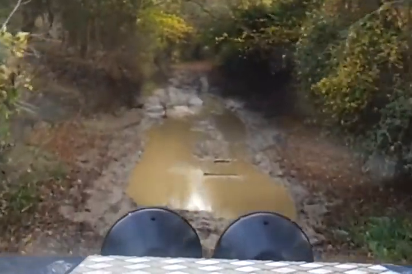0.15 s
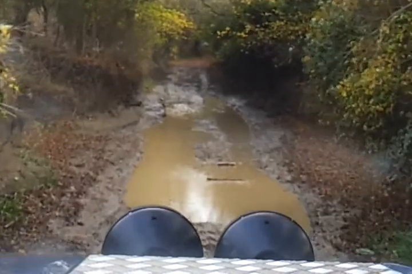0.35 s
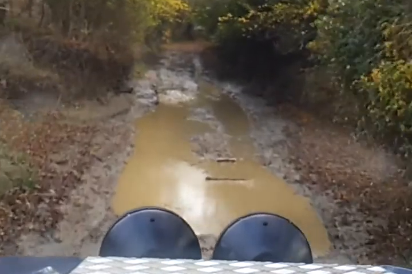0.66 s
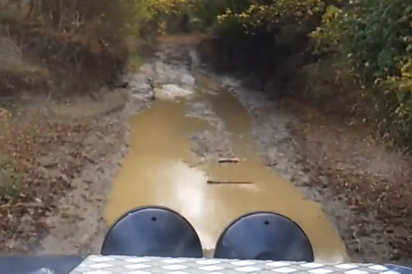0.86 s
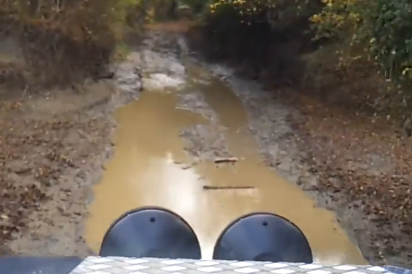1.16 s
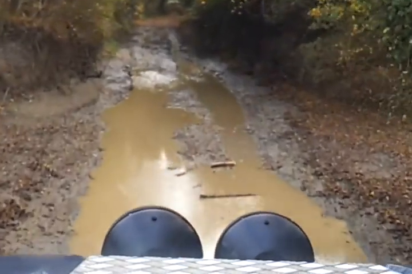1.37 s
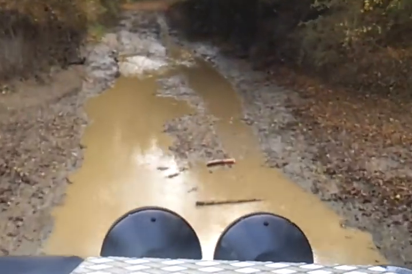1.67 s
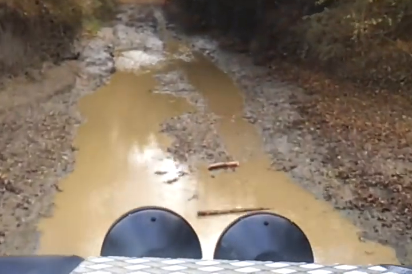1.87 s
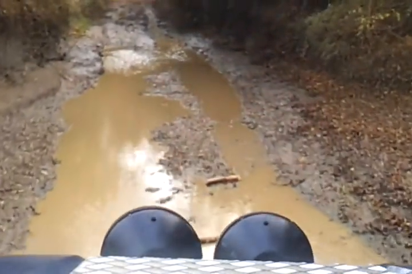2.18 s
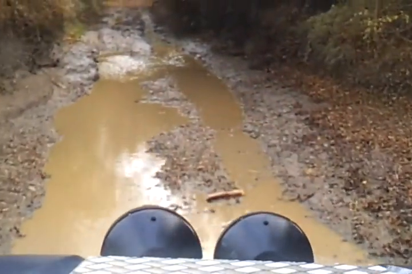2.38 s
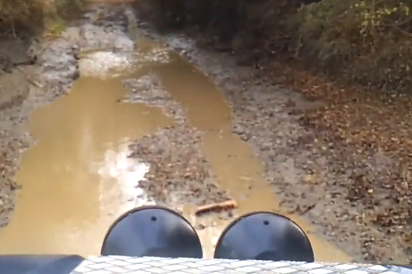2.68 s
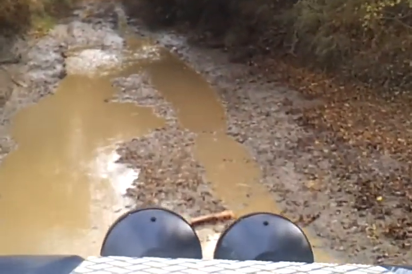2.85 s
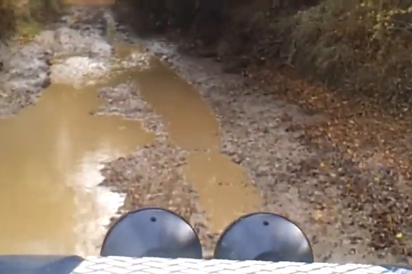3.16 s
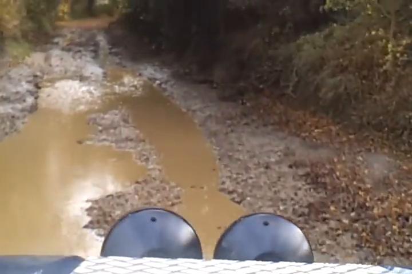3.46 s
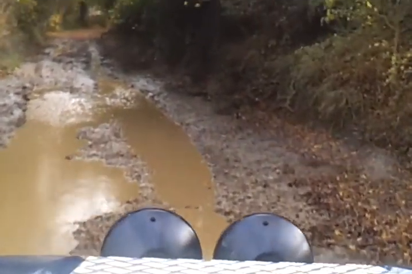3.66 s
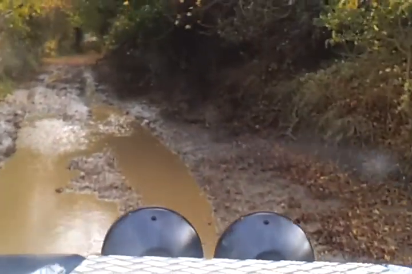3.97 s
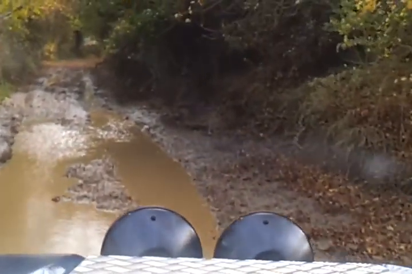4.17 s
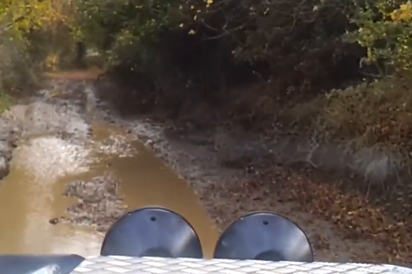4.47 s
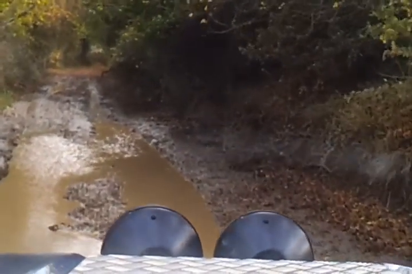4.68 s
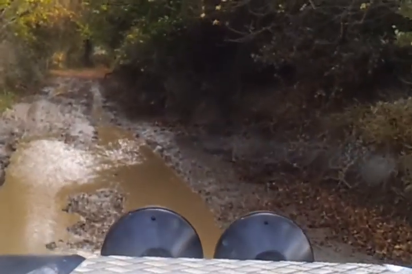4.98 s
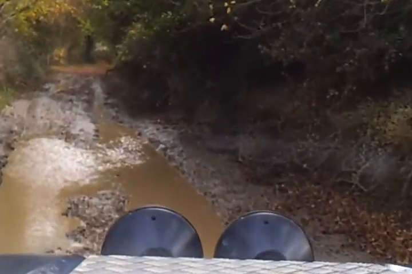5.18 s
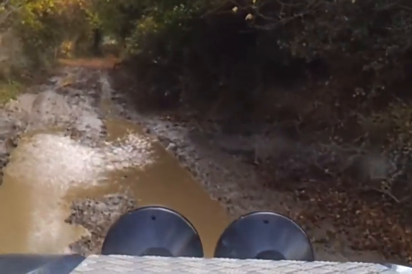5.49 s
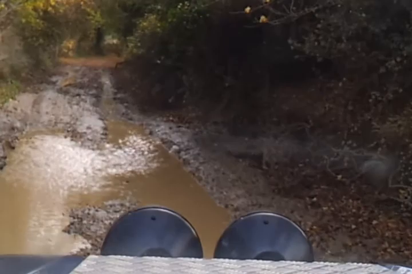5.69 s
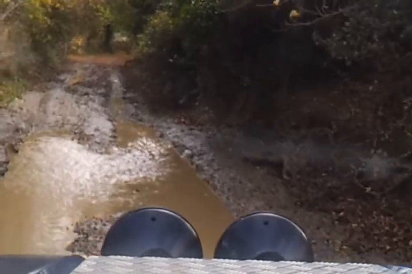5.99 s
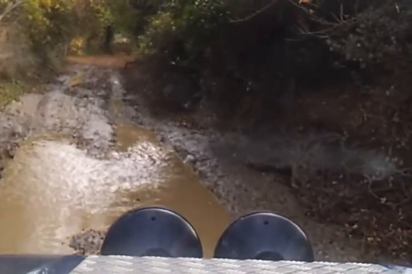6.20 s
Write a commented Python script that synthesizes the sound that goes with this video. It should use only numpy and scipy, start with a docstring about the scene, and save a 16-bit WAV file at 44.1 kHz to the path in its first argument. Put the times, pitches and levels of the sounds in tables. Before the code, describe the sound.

Inside an off-road vehicle, a four-cylinder engine growls, slows and settles into a knocking low-speed chug. An early jolt leaves a metal bar ringing. The body drums and roars over ruts, with thumps, rattling trim and small metal jingles. After a clattering bump just past one second, water gurgles faintly below and hisses. Later knocks come in clusters as revs creep up. Close, boxy cab sound with dull treble.

```python
"""Fording mud in a four-cylinder off-roader

Heard from inside the cab: an engine of wavering sine orders fires about thirty times a second and knocks.
Shaped noise drums, roars, clatters and hisses; bumps swell a cab boom and a struck metal bar rings on.
Noise bursts through bands and resonances thump, rub, jingle and knock; from 1.3 s rising sines gurgle."""
import sys
import numpy as np
from scipy import signal
from scipy.fft import rfft, irfft
from scipy.io import wavfile
from scipy.ndimage import uniform_filter1d

SR = 44100
rng = np.random.default_rng(int(sys.argv[2]) if len(sys.argv) > 2 else 0)


def transcribe(u):
    """Save the signal u as a 16-bit wav file named by the first command-line argument.

    u: samples, shape (n,) or (channels, n), limited to [-1, 1]; the rate is SR.
    q: integer samples, one column per channel.
    """
    v = np.clip(np.atleast_2d(u).T, -1, 1)
    q = np.round(v * 32767).astype(np.int16)
    wavfile.write(sys.argv[1], SR, q)


N = 279594

# Pace of the engine. Each row: time in seconds, firing rate in Hz.
FIRING_RATE = [(0.0, 39.2), (0.48, 37.7), (1.09, 33.2), (1.42, 31.6), (1.75, 28.4), (2.75, 28.4),
               (3.04, 29.2), (3.3, 29.3), (3.78, 28.9), (4.22, 29.7), (4.43, 25.9), (4.5, 26.0),
               (4.7, 28.6), (5.01, 28.7), (5.47, 29.9), (6.34, 31.8)]
# Broad sounds of the ride. Each row: time in seconds, then levels in dB of the body drumming,
# of the cab roar ahead of the panels, and of the water hiss.
RIDE_LEVELS = [(0.0, -40, -23, -43), (0.09, -24.5, -25, -41), (0.3, -25.5, -31.5, -42.5),
               (1.25, -28.5, -34, -43.5), (1.36, -30, -37.5, -43), (2.26, -30.5, -34.5, -44.5),
               (2.84, -32, -33.5, -43), (3.05, -36.5, -35.5, -42), (3.74, -27.5, -30, -39.5),
               (4.11, -31, -32.5, -40), (4.45, -29, -29.5, -38), (4.84, -29.5, -32.5, -39),
               (5.44, -25.5, -31.5, -37), (5.63, -29.5, -31, -39), (5.97, -26, -31.5, -37.5),
               (6.34, -26.5, -31, -39)]
IDLE_HZ = 29  # firing rate at which clatter and combustion knock have their plain levels


def amp(db):
    """Amplitude factor of a level in dB."""
    return 10 ** (np.asarray(db) / 20)


def evened(x):
    """Scales a sound to rms 1."""
    return x / np.sqrt(np.mean(x ** 2) + 1e-20)


def peaked(x, db):
    """Scales a sound to a peak level in dB."""
    return amp(db) * x / abs(x).max()


def curves(rows):
    """Each column of a table, drawn out sample by sample."""
    s, *columns = np.transpose(rows)
    return [np.interp(np.arange(N) / SR, s, c) for c in columns]


def add(mix, s, sound):
    """Lays a sound into the mix at s seconds."""
    part = mix[round(s * SR):][:len(sound)]
    part += sound[:len(part)]


def wander(per_s):
    """Slow random drift of rms 1, rolled off above per_s Hz."""
    count = N // 128 + 2
    hz = np.fft.rfftfreq(count, 128 / SR)
    smooth = irfft(rfft(rng.standard_normal(count)) / (1 + (hz / per_s) ** 4), count)
    return np.interp(np.arange(N) / 128, np.arange(len(smooth)), evened(smooth))


def coloured(x, points, size=4096):
    """Filters x by a spectrum given in dB on a log-frequency axis, then evens it to rms 1."""
    f, db = np.transpose(points)
    hz = np.fft.rfftfreq(size, 1 / SR)
    response = amp(np.interp(np.log(hz + 1), np.log(f), db))
    taps = np.roll(irfft(response), size // 2) * np.hanning(size)
    return evened(signal.oaconvolve(x, taps, "same"))


def band(x, hz, octaves):
    """A bell-shaped band on a log-frequency axis; octaves is the bell's standard deviation."""
    f = np.fft.rfftfreq(len(x), 1 / SR) + 1
    return irfft(rfft(x) * np.exp(-.5 * (np.log2(f / hz) / octaves) ** 2), len(x))


def resonate(x, hz, width):
    """A fixed resonance of gain 1, width in Hz."""
    r = np.exp(-np.pi * width / SR)
    return 2 * signal.lfilter([1 - r], [1, -r * np.exp(2j * np.pi * hz / SR)], x).real


def ring(x, modes):
    """x strikes a set of modes; the factor t60 lets narrow modes start as strongly as wide ones."""
    return sum(amp(db) * resonate(x, hz, 2.2 / t60) * t60 for hz, db, t60 in modes)


def shake(length, t60, lumps_db):
    """Noise that holds for the contact time, in uneven lumps, then dies away."""
    t = np.arange(round(.25 * SR)) / SR
    noise, lumps = rng.standard_normal((2, len(t)))
    lumps = amp(lumps_db * evened(uniform_filter1d(lumps, size=90)))
    attack = np.minimum(t / 0.00051, 1)
    fade = amp(-60 * np.maximum(t - length, 0) / max(t60, .005))
    return noise * lumps * attack * fade


def crackle(x):
    """Sparse sharp contacts stand out of a rattle, each decaying with a half-millisecond constant."""
    contacts_per_s, contact_db = 600, 5
    hits = (rng.random(len(x)) < contacts_per_s / SR) * rng.random(len(x))
    spikes = signal.lfilter([1], [1, -np.exp(-1 / (.0005 * SR))], hits)
    return x * (1 + amp(contact_db) * spikes)


def puffs(firings, fade):
    """One burst a firing, uneven between cylinders and strokes; fade is in firing periods."""
    # Relative strength of each cylinder's burst, in firing order, in dB.
    cylinder_db = np.array([0, -3, -7, -10.])
    stroke = firings.astype(int)
    chance_db = 1.5 * rng.standard_normal(stroke[-1] + 1)[stroke]
    strength_db = cylinder_db[stroke % 4] + chance_db
    return evened(amp(strength_db) * np.exp(-(firings % 1) / fade))


def engine():
    """Firing orders as wavering sines; also returns the running count of firings."""
    # Lowest orders. Each row: time in seconds, level in dB of the firing tone, level in dB of its octave.
    low_orders = [(0, -30, -16.5), (.1, -36, -24.5), (.22, -18.5, -27.5), (.35, -29, -24), (.5, -22.5, -27),
                  (.62, -28, -25), (.7, -21, -32), (.78, -33, -28.5), (.88, -24, -20.5), (1., -31, -25),
                  (1.12, -25, -26), (1.2, -24.5, -35), (1.28, -28, -35), (1.4, -47, -34), (1.8, -36.5, -33),
                  (2.1, -33.5, -39), (2.4, -44.5, -47), (2.8, -32.5, -43), (3.1, -27.5, -29.5),
                  (3.4, -27, -31), (3.75, -26.5, -29.5), (4.05, -31.5, -39), (4.3, -33.5, -32),
                  (4.55, -42, -27), (4.9, -24.5, -29.5), (5.2, -29, -29), (5.5, -26.5, -40.5),
                  (5.85, -28, -27), (6.05, -36, -30), (6.34, -39, -29.5)]
    # Each row: time in seconds, levels in dB of the 3rd, 4th, 5th and 6th multiple of the firing rate.
    middle_orders = [(0.0, -34, -36, -37, -39), (0.2, -36, -29, -41, -42), (0.5, -37, -32.5, -45, -60),
                     (0.75, -45, -37.5, -40, -46), (0.95, -38, -44, -30, -63), (1.2, -29, -38, -37, -49),
                     (1.45, -46.5, -63, -50, -52), (1.8, -41, -40, -52, -61), (2.3, -56, -39.5, -53, -51),
                     (2.8, -47, -41.5, -48, -50), (3.1, -39, -38, -50, -45), (3.4, -40, -40.5, -42, -40),
                     (3.7, -32, -33, -41, -41), (4.0, -40.5, -43, -45, -49), (4.3, -38.5, -39, -38.5, -42),
                     (4.6, -32.5, -36, -41, -40), (4.9, -32.5, -44, -38, -37.5),
                     (5.2, -36.5, -35, -38.5, -35.5), (5.5, -40, -42, -39.5, -39),
                     (5.8, -41, -39, -39, -36), (6.1, -36, -36, -36.5, -41.5), (6.34, -49, -42, -38, -38)]
    # Faint orders, quarter ones from uneven cylinders. Each row: multiple of the firing rate, relative dB.
    faint_orders = [(.75, -6), (1.25, 0), (1.5, -6), (1.75, -1), (2.25, 0), (2.5, -6), (2.75, -6),
                    (3.5, -11), (7, -8), (8, -12)]
    faint_db, faint_waver_db = -13.5, 1  # level under the two lowest orders together; extra waver

    firings = np.cumsum(curves(FIRING_RATE)[0]) / SR
    first_db, second_db = curves(low_orders)
    both_db = 10 * np.log10(amp(2 * first_db) + amp(2 * second_db))
    orders = list(enumerate([first_db, second_db] + curves(middle_orders), start=1))
    for multiple, db in faint_orders:
        orders.append((multiple, both_db + faint_db + db + faint_waver_db * wander(3.4)))

    tones = np.zeros(N)
    for multiple, db in orders:
        phase = 2 * np.pi * (multiple * firings + rng.random()) + .4 * wander(7.)
        tones += amp(db + 1.5 * wander(9.)) * np.sin(phase)
    return np.sqrt(2) * tones, firings


def combustion(firings):
    """The knock rings the engine block and, more slowly, one narrow singing cab panel."""
    # Engine block resonances. Each row: centre in Hz, width in Hz, relative level in dB.
    block_modes = [(1270, 200, 7.5), (1595, 79, 3.5), (2077, 45, 3.5), (2660, 130, -7)]
    # Singing panel. Each row: time in seconds, level in dB of its knocked part.
    panel_levels = [(0, -44), (.2, -42), (.3, -41.5), (.45, -47), (.6, -42), (1.2, -55), (1.4, -48.5),
                    (1.7, -44), (2.5, -41), (2.9, -46.5), (3.3, -43.5), (3.75, -54), (3.9, -36.5),
                    (4., -48), (4.3, -40), (4.4, -39), (4.6, -41.5), (5.4, -38.5), (5.6, -52),
                    (5.83, -40.5), (6.2, -44), (6.34, -37.5)]
    knock_db, sag_db_per_hz = -47.5, -1.5  # level at idle; softer as the engine runs faster
    panel_hz, note_db = 984., 7  # the steady note's level is against the knocked part

    a, b = rng.standard_normal((2, N))
    knock = a * puffs(firings, .25)
    block = np.zeros(N)
    for hz, width, db in block_modes:
        block += amp(db) * resonate(resonate(knock, hz, width), hz, 4 * width) / np.sqrt(width)
    late_knock = b * puffs(firings - .15, .35)
    knocked = resonate(resonate(late_knock, panel_hz, 13.), panel_hz, 60.)

    phase = 2 * np.pi * panel_hz * np.arange(N) / SR + 1.3 * wander(10.)
    note = amp(1. * wander(12.)) * np.sin(phase)
    # the note sags over the last third of each four firings, which takes in the weakest cylinder
    cycle = np.where(firings / 4 % 1 < .67, 1, .45)
    panel = evened(knocked) + amp(note_db) * evened(note * uniform_filter1d(cycle, size=400))
    block_db = knock_db + sag_db_per_hz * (curves(FIRING_RATE)[0] - IDLE_HZ)
    return amp(block_db) * evened(block) + amp(curves(panel_levels)[0]) * evened(panel)


def through_panels(x):
    """The cab panels add their resonances to whatever shakes them."""
    # Each row: centre in Hz, width in Hz, gain in dB against the broad sound.
    panels = [(1384, 73, -5), (1670, 28, -13.5), (2110, 42, -3)]
    return x + sum(amp(db) * resonate(x, hz, width) for hz, width, db in panels)


def ride(firings):
    """Noise as drumming, roar and clatter in the body, and hiss with droplets, the last three firing-pulsed."""
    # Spectra of the four noises. Each row: frequency in Hz, relative level in dB per Hz.
    drum_spectrum = [(8, -40), (14, -14), (20, -3), (30, 0), (60, 0), (110, -6.5), (160, -6), (200, -7),
                     (280, -13), (400, -14), (520, -40), (880, -120)]
    roar_spectrum = [(120, 0), (200, -3), (276, 5), (438, 11.5), (765, 3.5), (851, -2.5), (907, -25),
                     (981, -11), (1100, -12), (1430, -54), (2420, -120)]
    clatter_spectrum = [(470, -43), (800, -3.5), (898, 1.5), (981, 3), (1080, -1.5), (1660, -3),
                        (2080, -7.5), (2270, -20.5), (2800, -10), (3640, -49.5), (6160, -120)]
    hiss_spectrum = [(1290, -6.5), (2200, -6.5), (2490, -9), (2750, -11), (3100, -8), (3460, -7),
                     (4010, -8.5), (5810, -8.5), (6650, -11), (7270, -23.5), (7660, -22), (9960, -2),
                     (16900, -120)]
    clatter_over_hiss_db, sag_db_per_hz = 0.5, -0.07  # at idle; softer as the engine runs faster
    roar_sway_db, roar_jolt_db = 1.3, .7

    drum_db, roar_db, hiss_db = curves(RIDE_LEVELS)
    clatter_db = hiss_db + clatter_over_hiss_db + sag_db_per_hz * (curves(FIRING_RATE)[0] - IDLE_HZ)
    a, b, c, d = rng.standard_normal((4, N))
    jolts = wander(7.1)  # the ruts shake roar, clatter and hiss together
    beat = puffs(firings, 0.96)

    drum = amp(drum_db + 0.92 * wander(4.0)) * coloured(a, drum_spectrum, size=16384)
    roar_db = roar_db + roar_jolt_db * jolts + roar_sway_db * wander(3.9)
    roar = amp(roar_db) * coloured(b * (1 + 0.17 * beat), roar_spectrum)
    clatter_db = clatter_db + 1.0 * jolts + 0.7 * wander(20.0)
    clatter = amp(clatter_db) * coloured(c * (1 + 0.13 * beat), clatter_spectrum)

    drops = amp(1.6 * np.minimum(rng.exponential(1, N), 4)) * (rng.random(N) < 40. / SR)
    bursts = signal.lfilter([1], [1, -np.exp(-1 / (0.0092 * SR))], drops)  # each drop bursts and fades
    spray = 1 + 0.13 * beat + 0.13 * bursts
    hiss = amp(hiss_db + .7 * jolts + .5 * wander(18.)) * coloured(d * spray, hiss_spectrum)
    return drum + through_panels(roar + clatter) + hiss


def boom():
    """Shaking of the road gathered in one broad cab resonance near 450 Hz; each bump swells it."""
    # Bumps that shake the cab. Each row: start in seconds, level in dB added to the boom at its height.
    bumps = [(.05, -32), (.57, -31), (.97, -29.5), (1.238, -25.5), (1.61, -30), (1.952, -30.5),
             (2.401, -38), (2.699, -29), (3.368, -35), (3.7, -41), (4.44, -38), (4.56, -27.5), (4.83, -28),
             (6.24, -29)]
    boom_db, rise_s, t60_s = -19, 0.034, 0.31  # steady boom against the roar; swell and fade of a bump
    shaking, t = rng.standard_normal(N), np.arange(SR) / SR
    level = amp(curves(RIDE_LEVELS)[1] + boom_db)
    for s, db in bumps:
        fade_db = -60 * np.maximum(t - rise_s, 0) / t60_s
        add(level, s, np.minimum(t / rise_s, 1) * amp(db + fade_db))
    return level * evened(resonate(resonate(shaking, 446.5, 59.0), 450., 570.0))


def bar():
    """Two blows set a long-ringing metal bar going; it flutters in its mounts, the high modes most."""
    # Modes of the bar. Each row: frequency in Hz, relative level in dB, 60 dB fade in seconds.
    bar_modes = [(422, 1, 1.5), (565, -1, 1.8), (612, -3, .9), (689, -3, 3.2), (832, -5, .4),
                 (1210, -7, .25), (1319, -16, .6), (1550, -12, .5), (1672, -10, .6), (2250, -16, .25),
                 (2600, -19, .2), (2900, -16, .2), (3250, -12, .25)]
    # Each row: start in seconds, level in dB, rise in seconds.
    blows = [(0., -57.5, 0.0018), (.065, -24, 0.017)]
    out, t = np.zeros(N), np.arange(2 * SR) / SR
    for s, db, rise in blows:
        ringing = np.zeros(len(t))
        for hz, mode_db, t60 in bar_modes:
            flutter_db = (.3 + hz / 1500) * wander(25.)[:len(t)]
            phase = 2 * np.pi * (hz * t + rng.random()) + hz / 7000 * wander(30.)[:len(t)]
            ringing += amp(mode_db - 60 * t / t60 + flutter_db) * np.sin(phase)
        add(out, s, amp(db) * np.minimum(t / max(rise, .001), 1) * ringing)
    return out


def thumps():
    """Soft blows ring low body resonances, one for each thump."""
    # Each row: start in seconds, peak level in dB, pitch in Hz,
    # fade setting in seconds (the resonance alone falls 60 dB in about half of it).
    thump_rows = [(0.012, -13.5, 216, 0.18), (0.602, -19, 450, 0.045), (.969, -22, 535, 0.051),
                  (1.139, -11.5, 139, 0.07), (1.164, -16, 155, 0.11), (1.648, -26, 453, 0.17),
                  (1.978, -23, 510, 0.14), (2.461, -19, 483, 0.073), (3.034, -14.5, 232, 0.06),
                  (3.376, -19.5, 350, 0.094), (3.386, -20, 167, 0.092), (3.397, -17.5, 510, 0.21),
                  (3.53, -20.5, 462, 0.099), (3.77, -19.5, 483, 0.054), (4.444, -17, 680, 0.054),
                  (4.576, -21.5, 188, 0.47), (5.516, -25, 450, 0.069)]
    out = np.zeros(N)
    for s, db, hz, fade in thump_rows:
        push = resonate(shake(0.0038, 0.051, 0), hz, 99.0 + 0.67 * hz)  # a soft blow has little treble
        add(out, s, peaked(resonate(push, hz, 4.5 / max(fade, .01)), db))
    return out


def door():
    """Short crackling blows, and two longer rubs, ring the resonances of a door."""
    # Each row: start in seconds, peak level in dB of the contact, centre in Hz, bell width in octaves,
    # contact time in seconds, peak level in dB of the ringing door.
    contact_rows = [(0.055, -30, 1600, 1, 0.075, -26.5), (1.258, -29, 800, 0.84, .003, -15),
                    (1.272, -30, 1300, 1.1, 0.0043, -19.5), (1.287, -28, 800, 0.85, 0.0072, -16),
                    (1.302, -35, 700, 1, 0.0049, -22), (3.372, -28, 690, 0.17, 0.036, -38)]
    # Modes of the door. Each row: frequency in Hz, relative level in dB, 60 dB fade in seconds.
    door_modes = [(310, 5, .06), (441, 9, .07), (635, 0, .05), (915, -2, .05), (978, 3, .07),
                  (1100, -3, .04), (1400, -13, .04), (3600, -14, .03)]
    out = np.zeros(N)
    for s, db, hz, octaves, length, door_db in contact_rows:
        contact = band(crackle(shake(length, .02, 1.5)), hz, octaves)
        add(out, s, peaked(contact, db) + peaked(ring(contact, door_modes), door_db))
    return out


def jingles():
    """Small loose metal: a crackling rattle blended with a clear ring of struck links."""
    # Each row: start in seconds, peak level in dB, centre in Hz, share of clear ring from 0 to 1.
    jingle_rows = [(0.219, -31.5, 4280, 0.25), (.277, -29.5, 5200, 0), (0.39, -30, 4140, 0.1),
                   (0.449, -29, 6070, 0), (.474, -31, 4470, 0), (0.709, -14.5, 5900, 0.7),
                   (0.999, -16.5, 6150, 0.14), (1.187, -19.5, 5950, 0.67), (1.789, -33, 5740, 0),
                   (1.885, -33, 7000, 0.4), (3.037, -22, 5570, 0), (3.359, -20.5, 6000, 0.3),
                   (3.522, -28.5, 4700, 0), (3.614, -20.5, 5540, 0.24), (3.677, -30, 5270, 0.3),
                   (3.833, -21.5, 6300, 0.2), (4.037, -24, 6200, 0.3), (4.907, -23.5, 5940, 0.06),
                   (5.049, -23.5, 5870, 0.1), (5.186, -28, 5300, 0)]
    # Modes of the links. Each row: frequency in Hz, relative level in dB, 60 dB fade in seconds.
    link_modes = [(2850, -20, .04), (4258, -17, .04), (5432, -15, .04), (5850, -11, .04), (6304, -15, .03),
                  (7060, 0, .06), (8900, 0, .025)]
    shake_s, t60_s, ring_t60_s = 0.007, 0.075, 0.1  # a clear ring lengthens the fade
    out = np.zeros(N)
    for s, db, hz, clear in jingle_rows:
        clear = np.clip(clear, 0, 1)
        rattle = crackle(shake(shake_s, t60_s + clear * ring_t60_s, 0.92))
        rattle = peaked(band(rattle, hz, .38), 0)
        chink = peaked(band(ring(shake(.003, .07, 4.), link_modes), hz, .6 + clear), 0)
        add(out, s, peaked((1 - clear) * rattle + clear * chink, db))
    return out


def knocks():
    """Crackling blows, sharpest at first contact, ring the loose trim."""
    # Each row: start in seconds, peak level in dB, centre in Hz, bell width in octaves,
    # rattling time in seconds.
    knock_rows = [(.586, -19.5, 1600, 1.3, 0.009), (.603, -31, 2500, 1., .003),
                  (1.198, -29, 1760, 1.1, 0.0084), (2.566, -17, 1520, 1.24, 0.013),
                  (3.038, -27.5, 2500, 1.1, .006), (3.373, -19.5, 2220, 1.9, 0.013),
                  (3.616, -34, 3000, 1.6, .005), (3.626, -23, 1770, 1.5, 0.02),
                  (3.817, -23, 1799, 1.5, 0.025), (4.041, -13.5, 1200, 1.34, 0.013),
                  (4.219, -28, 1800, 0.84, 0.0044), (4.37, -41, 2300, .8, 0.0019),
                  (4.396, -41, 1820, .6, 0.0064), (4.444, -21.5, 1750, 0.35, 0.003),
                  (4.506, -28, 1510, 0.71, 0.0046), (4.522, -18, 2200, 1.4, 0.003),
                  (4.526, -14, 1190, 1.3, 0.0074), (4.541, -24, 3000, 0.84, 0.0028),
                  (4.768, -37, 1400, 0.39, 0.0064), (5.046, -30, 2000, .74, 0.014),
                  (5.086, -20.5, 1500, 0.8, 0.011), (5.795, -14, 1590, 1.44, 0.0093),
                  (5.965, -28, 1780, 0.84, 0.013)]
    # Modes of the trim. Each row: frequency in Hz, relative level in dB, 60 dB fade in seconds.
    trim_modes = [(830, 9, .035), (880, 10, .045), (1336, 3, .06), (1640, 5, .05), (2050, 6, .05),
                  (2550, -2, .03), (3280, -3, .03), (3720, -5, .025), (4500, 3, .012)]
    tick, tick_s = .6, .0015  # the first contact stands out: extra share, decay constant
    t60_s, fade_per_rattle = 0.0063, 6.1  # a longer rattle dies away more slowly
    out = np.zeros(N)
    for s, db, hz, octaves, length in knock_rows:
        blow = crackle(shake(length, t60_s + fade_per_rattle * length, 1.5))
        contact = 1 + tick * np.exp(-np.arange(len(blow)) / (tick_s * SR))
        blow = band(blow * contact, hz, octaves)
        add(out, s, peaked(peaked(blow, 0) + peaked(ring(blow, trim_modes), -4), db))
    return out


def gurgles():
    """Water slops against the floor: sparse low bubbles, each a sine burst rising in pitch."""
    out, t = np.zeros(N), np.arange(3000) / SR
    level = amp(curves(RIDE_LEVELS)[1]) * (np.arange(N) > 1.3 * SR)  # follows the roar, from 1.3 s on
    for hz in np.geomspace(300, 1800, 14):
        sizes = amp(1.0 * np.minimum(rng.exponential(1, N), 3)) * (rng.random(N) < 2.5 / SR)
        swell = (hz * t / 3) * np.exp(-hz * t / 3.3)
        bubble = np.sin(2 * np.pi * hz * t * (1 + 2.5 * t)) * swell
        out += signal.oaconvolve(sizes, bubble)[:N] * (300 / hz) ** 3.0  # high bubbles are fainter
    return amp(-11.5) * level * evened(out)


def scene():
    """Everything heard in the cab, summed to one channel."""
    tones, firings = engine()
    running = tones + combustion(firings) + ride(firings) + boom()
    loose = bar() + thumps() + door() + jingles() + knocks()
    return (running + loose + gurgles())[None]


def record(dry):
    """The microphone channel drops to a faint shelf above about 7.6 kHz; then the band limit at 9.1 kHz."""
    lowpass = signal.firwin(127, 7550., window=("kaiser", 5.), fs=SR)
    dull = signal.oaconvolve(dry, lowpass[None], "same") + amp(-32.5) * dry
    limit = signal.firwin(511, 9100, window=("kaiser", 9), fs=SR)
    return signal.oaconvolve(dull, limit[None], "same")


dry = scene()
out = record(dry)
transcribe(out)
```